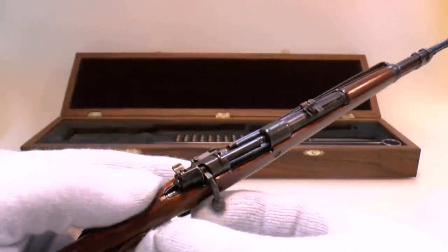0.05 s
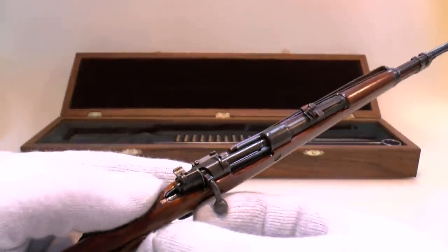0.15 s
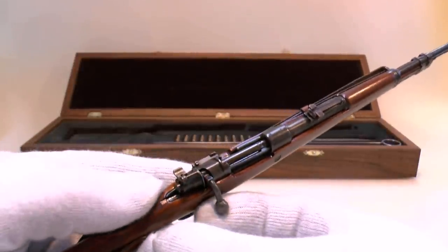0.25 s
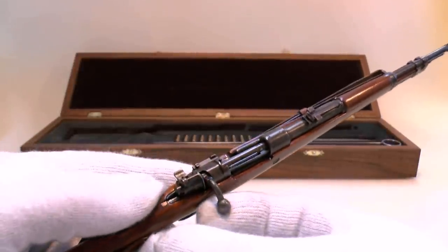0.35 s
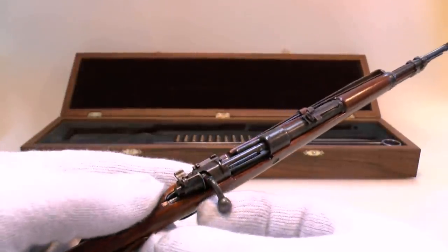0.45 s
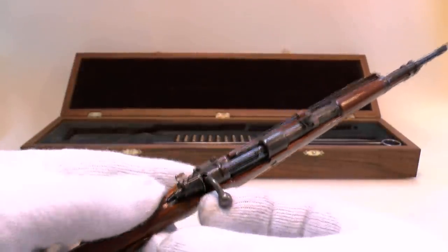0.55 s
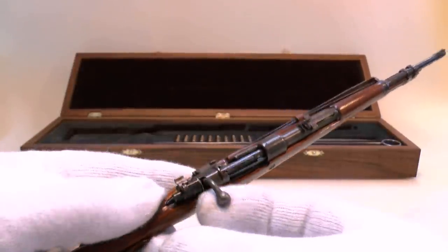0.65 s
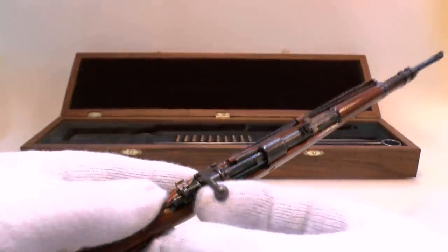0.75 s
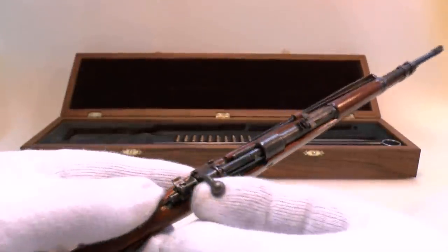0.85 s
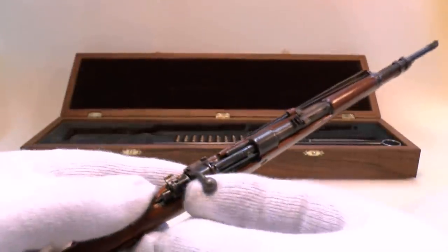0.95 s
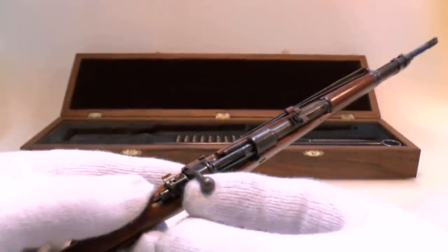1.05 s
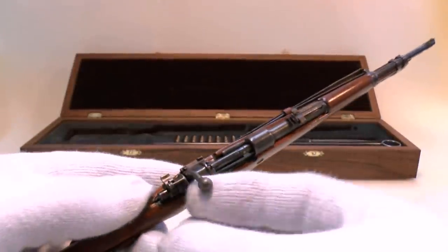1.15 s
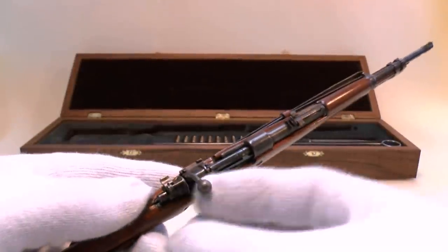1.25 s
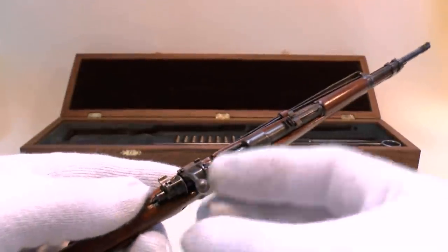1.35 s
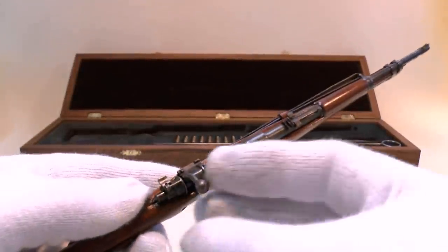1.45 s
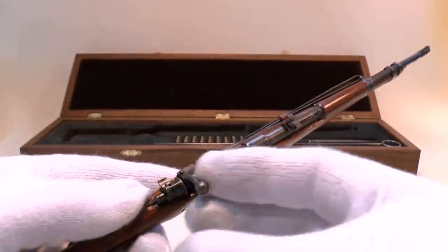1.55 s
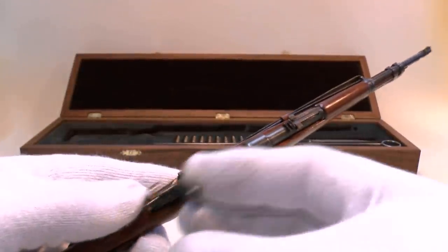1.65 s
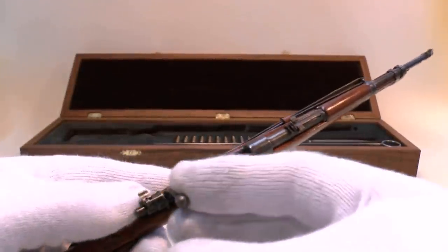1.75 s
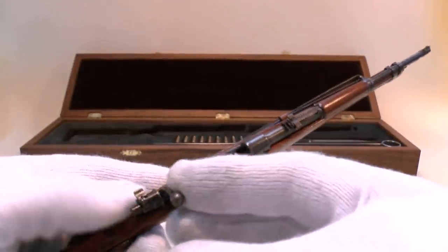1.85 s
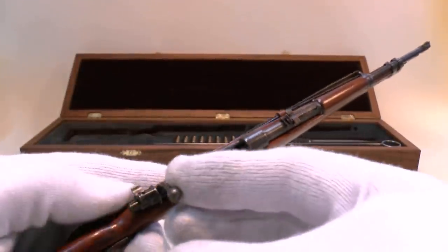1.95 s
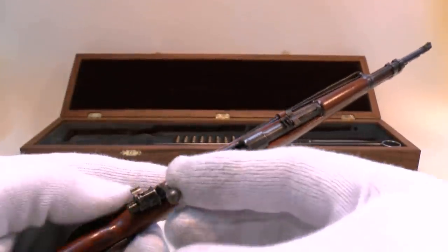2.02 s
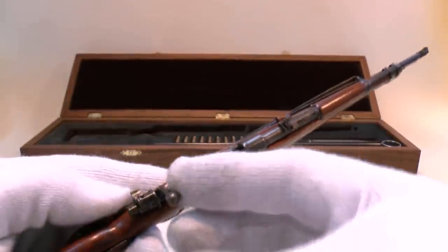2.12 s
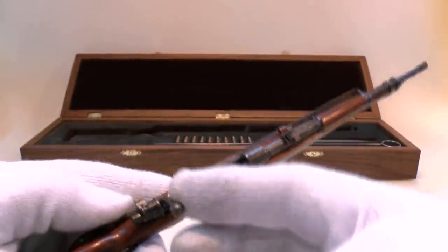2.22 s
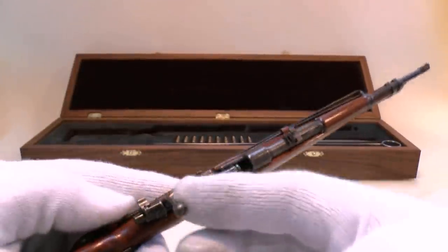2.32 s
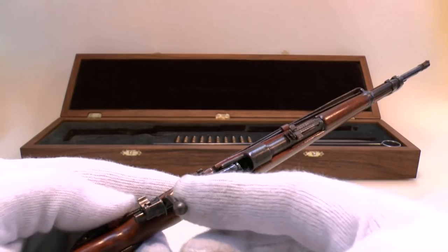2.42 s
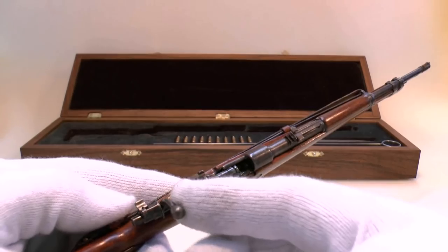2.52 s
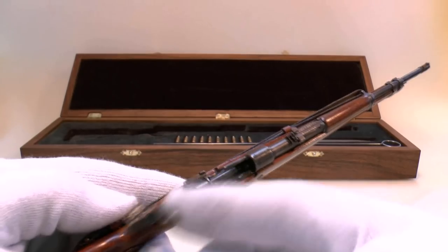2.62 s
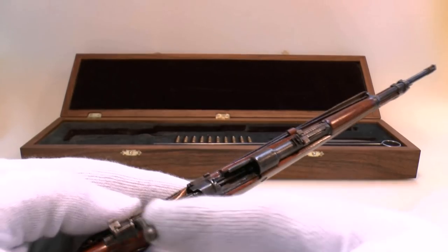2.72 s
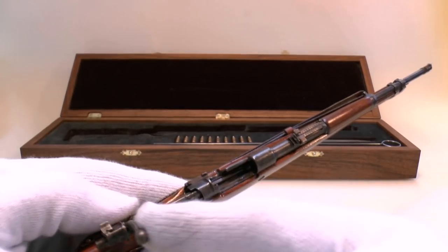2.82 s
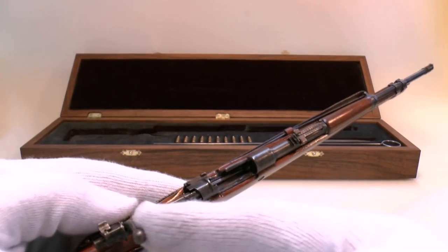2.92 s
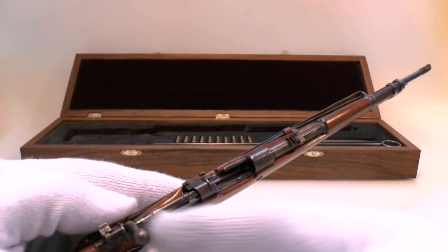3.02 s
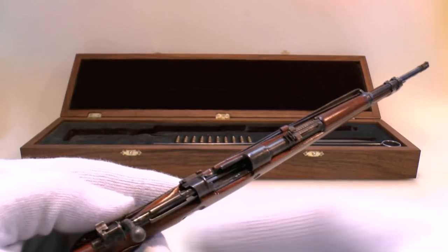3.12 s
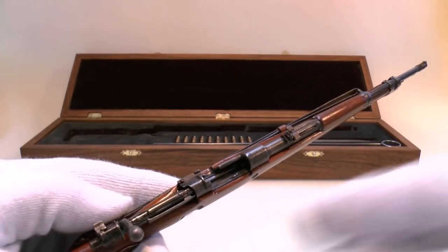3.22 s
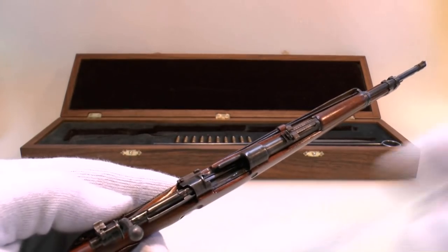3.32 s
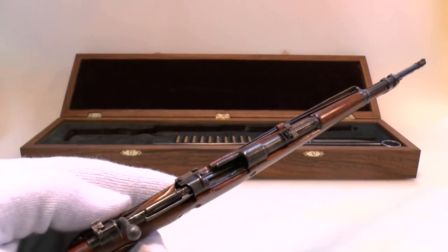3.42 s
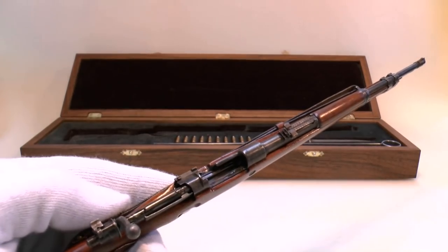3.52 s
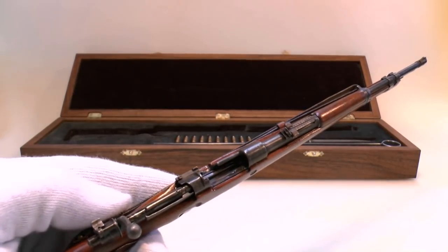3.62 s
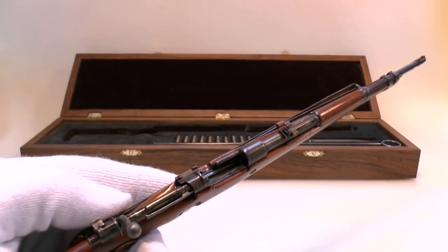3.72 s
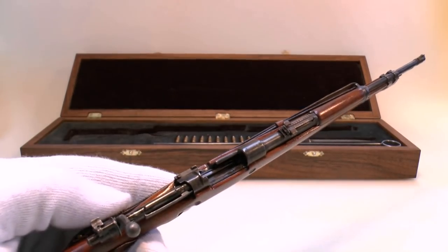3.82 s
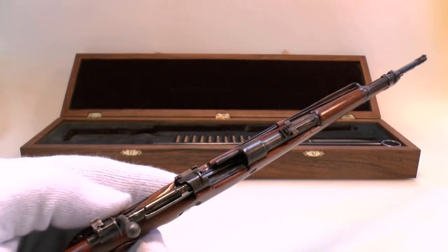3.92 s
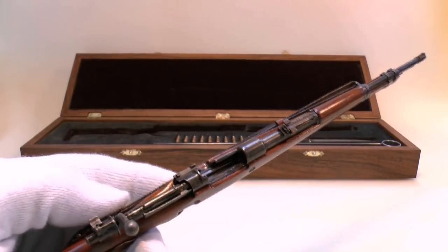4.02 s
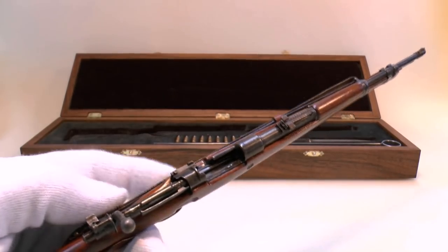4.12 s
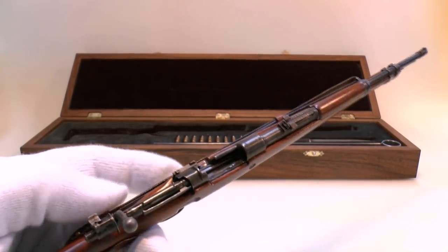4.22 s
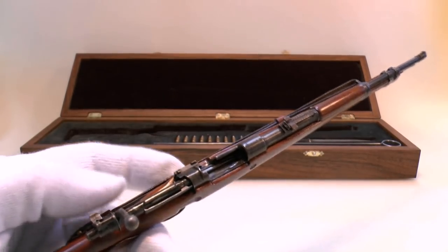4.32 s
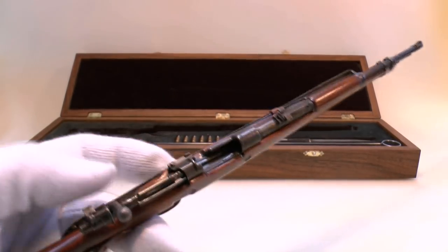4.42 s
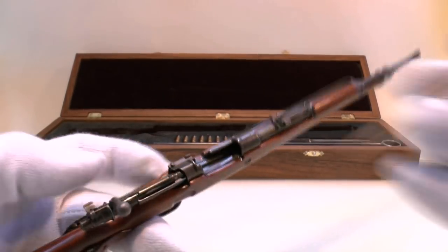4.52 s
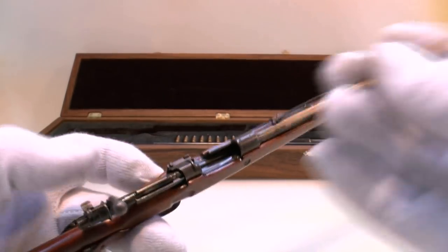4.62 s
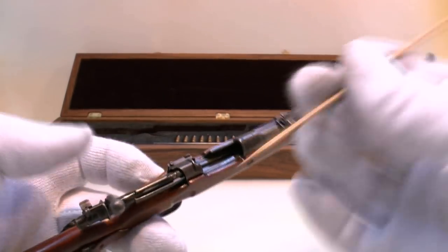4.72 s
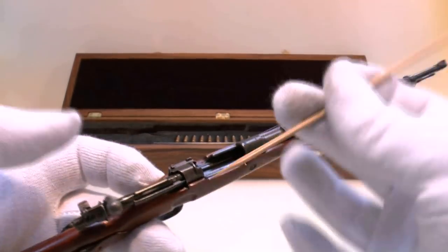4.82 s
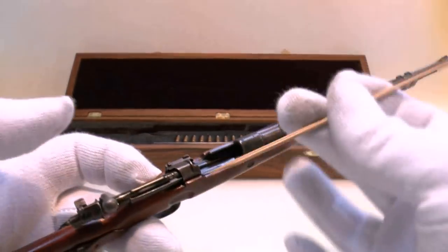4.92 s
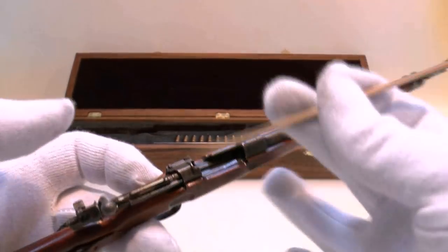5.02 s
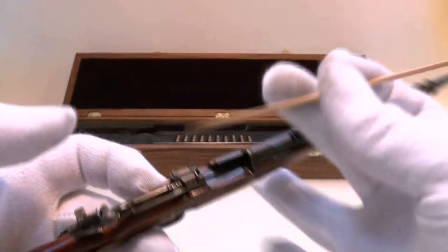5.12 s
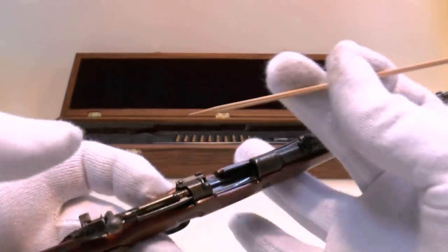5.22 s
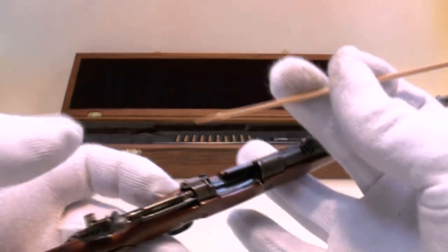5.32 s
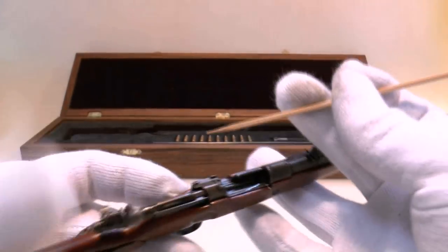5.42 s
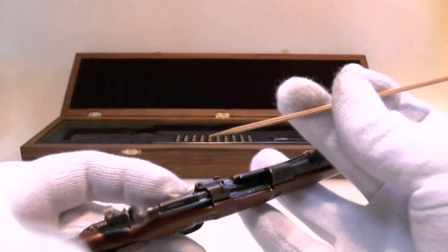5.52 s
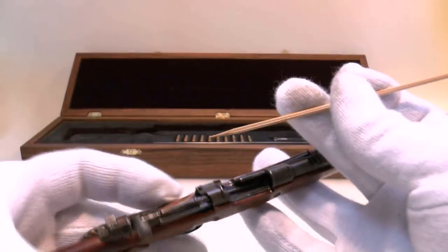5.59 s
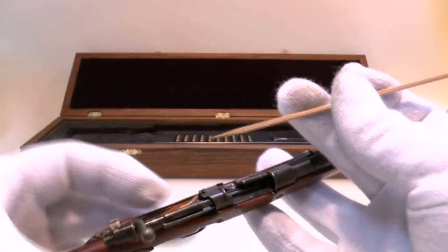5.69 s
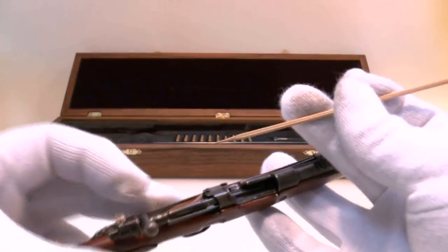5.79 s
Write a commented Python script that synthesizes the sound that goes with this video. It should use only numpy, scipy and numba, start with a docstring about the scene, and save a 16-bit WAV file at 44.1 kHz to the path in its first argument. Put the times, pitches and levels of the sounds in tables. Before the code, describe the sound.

Gloved hands work a small rifle's bolt, making light metallic clicks and one louder clack, with faint cloth rustle over a steady low hum.

```python
"""First comes a steady hum of fan and mains over airy hiss, with cotton gloves rustling up close.
The hands work the bolt of a small rifle: steel parts strike and slide, ringing the action and the
wooden stock, and rubbed parts squeak faintly. Each hit reflects off the tabletop at once, and a quiet
furnished room answers a moment later. Near 3 s the bolt hits its stop, the loudest clack, and jolts
the table under the microphones. A far rumble swells and fades beneath the last rustles."""
import sys
import numpy as np
from scipy import signal
from scipy.fft import rfft, irfft, next_fast_len
from scipy.io import wavfile
from scipy.ndimage import uniform_filter1d
from numba import njit

SR = 44100
rng = np.random.default_rng(int(sys.argv[2]) if len(sys.argv) > 2 else 0)


def put_to_file(sound):
    """Save the sound as 16-bit audio at rate SR, in the file named by the first command-line argument."""
    columns = np.atleast_2d(sound).T  # one column per channel
    safe = np.clip(columns, -1, 1)
    whole_steps = np.round(safe * 32767)
    wavfile.write(sys.argv[1], SR, whole_steps.astype(np.int16))


N = 258091

# harmonics of the fan shaft: multiple, rms level/dB
FAN_HARMONICS = [(2, -56), (3, -56.5), (4, -55), (5, -58.5), (6, -66.5), (7, -64.5), (8, -68)]
# harmonics of the mains buzz: multiple, rms level/dB
MAINS_HARMONICS = [(4, -75), (5, -63), (6, -69.5), (7, -66), (8, -79)]
# low narrow drones: f/Hz, rms level/dB, width/Hz
DRONES = [(60, -61, 8), (117, -60, 11), (248, -61, 14)]
# tone of the air noise and microphone hiss: f/Hz, relative level/dB
AIR_COLOUR = [(25, -49), (42, -43), (52, -17), (80, -9.5), (110, -6.5), (200, -1.5), (260, -6),
              (400, -15.5), (520, -13), (760, -21), (1300, -27.3), (2200, -31), (6000, -39), (12000, -39.5),
              (15500, -47)]
# how alike left and right are: f/Hz, correlation
STEREO_LIKENESS = [(60, 0.98916), (290, 0.96729), (640, 0.7499), (1400, 0.446), (3000, 0.3321), (6000, 1),
                   (9000, 0.441), (15000, 0.098)]
# glove moves: fullest t/s, rise/s, fall/s, rustle level/dB, rustle f/Hz, dull rub level/dB
GLOVE_MOVES = [(.17, .2, .08, -70, 5400, -68), (.42, .17, .14, -63, 7000, -68),
               (.73, .08, .06, -65, 7600, -68), (.86, .08, .09, -65, 7600, -68),
               (1.03, .04, .03, -68, 6900, -76), (1.26, .09, .14, -66, 7600, -60),
               (1.49, .12, .1, -69, 6800, -65), (2.07, .04, .07, -68, 6700, -65),
               (2.3, .05, .06, -63.5, 5400, -62), (2.48, .04, .04, -68, 7400, -75),
               (3.2, .14, .12, -61.5, 5900, -60), (3.6, .05, .22, -64, 7500, -80),
               (4.06, .015, .04, -65, 6500, -69), (4.22, .07, .08, -65, 6700, -64),
               (4.34, .02, .03, -67, 5200, -74), (4.52, .14, .13, -61, 7200, -62),
               (4.745, .045, .05, -56, 8600, -64), (4.9, .055, .06, -55.5, 7600, -63),
               (5.15, .15, .35, -67, 6700, -66.5), (5.59, .1, .12, -62.5, 7300, -60),
               (5.835, .05, .04, -58, 5800, -62)]
# hits of steel parts: t/s, peak level/dB (before chatter and bass cut), stock gain/dB,
# steel tilt/(dB per octave), favoured f/Hz, its lift/dB, second f/Hz, its gain/dB,
# tabletop reflection delay/ms, reflection gain/dB
HITS = [(.0675, -46, 9, -5, 2400, 6, 9000, -6, 1.4, -7),
        (.2142, -39.5, 14, -6, 2200, 10, 6500, -10, 1.37, -10),
        (.2544, -46, -5.5, -3, 11000, 6, 4000, 0.1, 1.4, -3),
        (.285, -47, -5, -4, 5700, 8, 7200, 6, 1.4, -6),
        (.4660, -37.5, 14, -2.5, 2200, 10, 10400, -10, 1.33, -10),
        (.7154, -46, 8, -5, 2090, 9, 9000, -4, 1.4, -9), (.7374, -46, 8, -5, 2260, 9, 9000, -4, 1.4, -7),
        (.755, -47, -3, -5, 4200, 10, 9000, -6, 1.4, -5),
        (.8050, -47, 3.5, -5, 4200, 6, 10000, -5, 1.6, -3), (.8867, -21, 0.1, 1, 5100, 5, 13000, 8, .6, -6),
        (.8876, -22, 10, -2, 2150, 3, 5100, 5, 1.1, -8), (1.1434, -39, -5, -1, 6000, 4, 9000, 3, .4, -3),
        (1.1446, -21, -3, 1.2, 5400, 9, 8400, 6, 1.9, -11),
        (1.8190, -28.5, 9, -7, 2300, 3.6, 7000, -4, .65, -9),
        (1.8322, -39, 1, -3, 4590, 6, 9000, -3, 1.43, -5.5),
        (1.8465, -40, 2, 0.1, 5500, 4, 8800, 4, .9, -3),
        (1.8490, -11.5, 4.5, -1, 3450, 4, 11000, 7.5, 1.35, -8),
        (1.9737, -29, 9, -6, 2500, 8, 7500, -8, 1.15, -6),
        (2.6709, -42, -2, -3, 8550, 6, 4000, 0.1, 1.22, -1.5),
        (2.7680, -47, 4.5, -5, 3810, 6, 9000, -2, 1.4, -12),
        (2.8422, -33, 8, -3, 3000, 6, 9000, -6, 1.4, -6), (2.8445, -21.5, 8, .5, 2700, 6, 7800, 6, .7, -7),
        (2.847, -27, 8, .5, 2900, 6, 10000, -6, 1.4, -8),
        (2.853, -29, -1.5, -1.5, 8200, 7, 4500, -3, 1.44, -9),
        (2.8600, -33, 6, -1.5, 1700, 5, 9000, -3, 2.6, 0.1),
        (2.8746, -21, 12, 3, 8700, 9, 12600, -8, 2.64, -9), (2.8870, -30, 6, .5, 2000, 6, 9000, 5, .73, -4),
        (2.8966, -36, 3.5, -2.5, 2600, 4, 9000, 4, 1.4, -6.5),
        (2.9880, -6.5, -9, 3, 5100, 7, 10400, 2.5, 1.58, -2),
        (2.9895, -24, -4, -1, 2040, 14, 7650, 8, 2.4, -5), (2.9925, -32, 2, -1, 2050, 12, 9600, 4, 1.4, -6),
        (4.1, -46, 6, -4, 2300, 4, 8000, -3, 1.4, -6),
        (4.2045, -33, 6.5, 2.5, 2200, 10, 9400, 3.5, .8, -11),
        (4.661, -48, 4, -2, 2500, 4, 8000, 2, 1.4, -6)]
# modes of the wooden stock: f/Hz, relative level/dB, t60/s, left minus right/dB
STOCK_MODES = [(1480, -13, .0095, 5.5), (1800, -6.5, .008, 4), (2030, -4.5, .013, 4),
               (2420, -5.5, .0075, 6), (2923, -1.8, .0062, 1.5), (3250, -1.5, .0075, 1),
               (3600, -5, .0065, 4), (3980, -10, .007, 3)]
# modes of the steel action: f/Hz, relative level/dB, t60/s, left minus right/dB
STEEL_MODES = [(4400, -3.5, .0095, 3), (5020, -5.5, .012, .8), (5380, -4, .0095, -.8), (5891, -9, .008, 3),
               (6300, -4, .0105, -.5), (6900, -3, .0069, .9), (7611, -8, .0105, -.7),
               (8117, -3, .0051, -.7), (8826, -2.5, .0115, 2.3), (9600, -2.5, .0095, -2.5),
               (10086, -2.5, .0048, .3), (10644, -8.5, .0095, -2.4), (11447, -4.5, .0062, 4),
               (12276, -11, .0095, 2.5), (13300, -13, .0053, 10), (13845, -13.5, .008, 5.3),
               (14900, -11, .004, .5)]
RIFLE_MODES = STOCK_MODES + STEEL_MODES
# tone of the room's tail: f/Hz, relative level/dB
ROOM_COLOUR = [(800, -10), (2000, -8), (3600, -5), (4300, -6), (5600, 1.5), (9500, -3), (12500, -7),
               (16000, -14)]
# rubbed parts singing: start t/s, end t/s, level/dB, start f/Hz, end f/Hz, width/Hz
SQUEAKS = [(.12, .23, -71, 5000, 5200, 400), (.16, .23, -72, 6200, 6200, 300),
           (.14, .4, -70, 2100, 2100, 25), (.23, .34, -70, 4200, 4300, 900),
           (.24, .3, -70, 5800, 6200, 2000), (.3, .56, -70, 8300, 8600, 1500),
           (.35, .5, -69, 5900, 6100, 1500), (.42, .54, -72, 2100, 2100, 25),
           (.64, .83, -68, 8700, 9310, 700), (.7, .77, -68, 3900, 4100, 1800),
           (1.25, 1.55, -68, 2200, 2150, 350), (1.675, 1.795, -67, 5130, 5030, 230),
           (4.72, 4.79, -64, 9300, 9300, 1500)]
# the bolt turns, then slides back in its channel: start t/s, end t/s, level/dB (before bass cut)
BOLT_STROKES = [(1.8, 1.849, -61), (2.824, 2.842, -56), (2.842, 2.902, -51.5)]
# knock through the table: t/s, level/dB, f/Hz, t60/s, left minus right/dB
TABLE_JOLT = (2.9887, -23, 175, .022, -9)
# far rumble: fullest t/s, rise/s, fall/s, level/dB, f/Hz, width/Hz
FAR_RUMBLE = (4.6, .7, .5, -58, 52, 30)


def undb(db):
    return 10 ** (np.asarray(db) / 20)


def unit(x):
    return x / np.sqrt(np.mean(x ** 2))


def band(x, hz, width_hz):
    return signal.lfilter(*signal.iirpeak(hz, hz / width_hz, fs=SR), x)


def narrow(x, hz, width_hz):
    """Two band-passes in a row, brought to rms 1."""
    return unit(band(band(x, hz, width_hz), hz, width_hz))


@njit
def swept_band(x, hz, q):
    """Band-pass whose centre moves, gain 1 at the centre."""
    y, mid, low = np.empty(len(x)), 0., 0.
    for i in range(len(x)):
        g = np.tan(np.pi * hz[i] / SR)
        v = (mid + g * (x[i] - low)) / (1 + g * (g + 1 / q))
        mid, low, y[i] = 2 * v - mid, low + 2 * g * v, v / q
    return y


def curve_at_bins(table, size):
    """A (f/Hz, value) curve read at the FFT bins, along log frequency."""
    hz, values = np.array(table).T
    bin_hz = np.maximum(np.arange(size // 2 + 1) * SR / size, 1)
    return np.interp(np.log(bin_hz), np.log(hz), values)


def stereo_noise(size, colour):
    """Coloured noise, as alike left and right as two close microphones hear it."""
    like = np.clip(curve_at_bins(STEREO_LIKENESS, size), 0, 1)
    mid, side = rfft(rng.standard_normal((2, size)))
    mid, side = mid * np.sqrt(1 + like), side * np.sqrt(1 - like)
    return unit(irfft(np.array([mid + side, mid - side]) * undb(curve_at_bins(colour, size)), size))


def waver(rate):
    """A smooth random drift that turns about rate times a second; spread near 1."""
    knots = uniform_filter1d(np.repeat(rng.standard_normal(int(N * rate / SR) + 2), 8), 8)
    return 1.2 * np.interp(np.arange(N) * (8 * rate / SR), np.arange(len(knots)), knots)


def swell(at, rise_s, fall_s, shape=1.5):
    """A hump of height 1; shape 1 is pointed, 2 is a bell."""
    t = np.arange(N) / SR - at
    return np.exp(-np.abs(t / np.where(t < 0, rise_s, fall_s)) ** shape)


def pan(left_minus_right_db):
    return undb(np.array([[1], [-1]]) * left_minus_right_db / 2)


def hum(fan_hz=48.391, mains_hz=100.):
    """The bed: wavering fan shaft harmonics, a near-steady mains buzz and low drones."""
    t = np.arange(N) / SR

    def stack(base_hz, harmonics, waver_db):
        return sum(np.sqrt(2) * undb(db + waver_db * waver(3.0194))
                   * np.sin(2 * np.pi * (k * base_hz * t + rng.random())) for k, db in harmonics)

    fan = stack(fan_hz, FAN_HARMONICS, waver_db=1.5)
    buzz = stack(mains_hz, MAINS_HARMONICS, waver_db=-.0811) * pan(-2.5)
    drones = sum(undb(db) * narrow(rng.standard_normal(N), hz, width) for hz, db, width in DRONES)
    return fan + buzz + drones


def air(level_db=-48):
    """Room tone: steady air noise and microphone hiss."""
    return undb(level_db) * stereo_noise(next_fast_len(N, True), AIR_COLOUR)[:, :N]


def gloves(rustle_q=.7, flicker_db=1.2, side_db=-9):
    """Cotton fibres slip over steel and wood: each move swells into a fine rustle and a duller rub."""
    moves = np.array([swell(*row[:3]) for row in GLOVE_MOVES])
    rustle_db, hz, rub_db = np.array(GLOVE_MOVES).T[3:]
    rustle_gain, rub_gain = undb(rustle_db) @ moves, undb(rub_db) @ moves
    # the loudest move pulls the rustle toward its own pitch
    centre_hz = (undb(rustle_db) * hz) @ moves / (rustle_gain + 1e-30)
    fibres = rng.standard_normal((4, N)) * undb(flicker_db * waver(60))
    rustle = unit(swept_band(swept_band(fibres[0], centre_hz, rustle_q), centre_hz, rustle_q))
    rustle_side = narrow(fibres[1], hz=10800, width_hz=3500)  # stereo width up top
    rub, rub_side = unit(band(fibres[2:], hz=2100, width_hz=1600))
    side = undb(side_db) * np.array([[1], [-1]])
    return (rustle + side * rustle_side) * rustle_gain + (rub + side * rub_side) * rub_gain


def ring(polarity, colour_db=0, tuning=1, length=1):
    """Stock and steel ring in stereo as decaying sines; length scales their decay times."""
    hz, db, t60, pan_db = np.array(RIFLE_MODES).T[:, :, None]
    t = np.arange(1024) / SR
    envelopes = undb(db + colour_db - 60 * t / (length * t60))
    tones = polarity * np.sin(2 * np.pi * hz * tuning * t) * envelopes
    return np.array([(tones * undb(side * pan_db / 2)).sum(axis=0) for side in (1, -1)])


def strike_colour(stock_db, tilt_db, favoured_hz, lift_db, second_hz, second_db):
    """Gain in dB per mode: the struck spot favours one pitch and lifts or mutes another."""
    hz = np.array(RIFLE_MODES)[:, :1]
    base = np.where(hz < STEEL_MODES[0][0], stock_db, tilt_db * np.log2(hz / 7000))
    favoured = lift_db * np.exp(-(np.log2(hz / favoured_hz) / .22) ** 2)
    second = second_db * np.exp(-(np.log2(hz / second_hz) / .25) ** 2)
    return base + favoured + second


def clicks(scatter_db=1.2, detune=.008, crack_db=-9, crack_t60=.0025, chatter_db=-9, chatter_t60=.026,
           send_db=1.8, ring_loss_per_db=.013):
    """Each hit cracks and rings, followed at once by a quick reflection off the tabletop."""
    close, send = np.zeros((2, 2, N + 4096))  # send feeds the room
    t = np.arange(1024) / SR
    # neighbouring stock modes, and pairs of steel modes, swing in opposite directions
    polarity = (-1.) ** np.r_[np.arange(len(STOCK_MODES)), 1 + np.arange(len(STEEL_MODES)) // 2][:, None]
    variations = rng.random((len(HITS), 2, len(RIFLE_MODES), 1)) - .5
    chatter = rng.standard_normal((len(HITS), 2, len(t))) * undb(-60 * t / chatter_t60)
    contacts = undb(chatter_db) * chatter / np.sqrt((chatter ** 2).sum(axis=2, keepdims=True))
    contacts[..., 0] += 1  # the clean impact ahead of the chatter of loose parts
    for row, (scatter, mistune), contact in zip(HITS, variations, contacts):
        at, peak_db, *spot, reflection_ms, reflection_db = row
        colour_db = strike_colour(*spot) + scatter_db * np.sqrt(12) * scatter
        length = 1 + ring_loss_per_db * peak_db  # softer hits ring shorter
        body = ring(polarity, colour_db, 1 + detune * mistune, length)
        # in the first instant the modes blur into a broad crack, which also reaches the walls
        crack = body * undb(-60 * t / crack_t60)
        crack *= np.sqrt((body ** 2).sum() / (crack ** 2).sum())
        click = body + undb(crack_db) * crack
        gain = undb(peak_db) / np.abs(click).max()
        hit, reflection = signal.fftconvolve(gain * click[None], contact[:, None], axes=2)
        i, j = int(at * SR), int((at + reflection_ms / 1000) * SR)
        close[:, i:i + hit.shape[1]] += hit
        close[:, j:j + hit.shape[1]] += undb(reflection_db) * reflection
        send[:, i:i + len(t)] += undb(send_db) * gain * crack * np.hypot(1, undb(reflection_db))
    return close[:, :N], send[:, :N]


def room(send, predelay_s=.0123, echo_db=-24, tail_db=-15, t60=.34):
    """The walls answer with a first echo, then a dense fading tail."""
    t = np.arange(16384) / SR
    tail = stereo_noise(len(t), ROOM_COLOUR) * undb(-60 * t / t60)
    response = undb(tail_db) * tail / np.sqrt((tail ** 2).sum(axis=1).mean())
    response[:, 0] += undb(echo_db)
    wet = signal.fftconvolve(send.mean(axis=0)[None], response, axes=1)
    return np.pad(wet, ((0, 0), (int(predelay_s * SR), 0)))[:, :N]


def squeaks(fade_s=.02946):
    """Rubbed parts sing faintly in bands of noise that hold or glide."""
    out = np.zeros(N)
    for start, end, db, start_hz, end_hz, width_hz in SQUEAKS:
        i, j = int(start * SR), int(end * SR)
        t = np.arange(i, j) / SR
        glide_hz = np.interp(t, [start, end], [start_hz, end_hz])
        tone = unit(swept_band(rng.standard_normal(j - i), glide_hz, start_hz / width_hz))
        envelope = np.interp(t, [start, start + fade_s, end - fade_s, end], [0, 1, 1, 0])
        out[i:j] += undb(db) * tone * envelope
    return out


def bolt_slides(grain_db=3., flutter_db=2.1, fade_s=.001413):
    """Dense uneven slips ring stock and steel while the bolt moves."""
    t = np.arange(N) / SR
    push = sum(undb(db) * np.interp(t, [start, start + fade_s, end, end + fade_s], [0, 1, 1, 0])
               for start, end, db in BOLT_STROKES)
    friction = rng.standard_normal(N)
    grit = undb(grain_db * rng.exponential(size=N) + flutter_db * waver(120))
    slips = push * unit(friction * grit)
    body = ring(polarity=np.sign(rng.standard_normal((len(RIFLE_MODES), 1))))
    body /= np.sqrt((body ** 2).sum(axis=1).mean())
    return signal.oaconvolve(slips[None], body, axes=1)[:, :N]


def table_jolt():
    """The bolt stop jolts the table: a low damped knock moves the two microphones opposite ways."""
    at, db, hz, t60, pan_db = TABLE_JOLT
    t = np.maximum(np.arange(N) / SR - at, 0)
    knock = np.sin(2 * np.pi * hz * t) * undb(db - 60 * np.minimum(t / t60, 4))
    return np.array([knock, -knock]) * pan(pan_db)


def far_rumble():
    """One low band of noise swells and fades in the distance."""
    at, rise_s, fall_s, db, hz, width_hz = FAR_RUMBLE
    return undb(db) * swell(at, rise_s, fall_s) * narrow(rng.standard_normal(N), hz, width_hz)


def scene(bass_cut_hz=1350):
    """The mix: hands, rifle and room over the steady bed."""
    hits, send = clicks()
    scrape = bolt_slides()
    # a small object radiates little bass
    bass_cut = signal.butter(5, bass_cut_hz, "high", fs=SR, output="sos")
    rifle = signal.sosfilt(bass_cut, hits + scrape)
    walls = room(signal.sosfilt(bass_cut, send + scrape))
    return hum() + air() + gloves() + rifle + walls + squeaks() + table_jolt() + far_rumble()


def record(dry):
    """A steep low-pass shaves off the top above 15.8 kHz."""
    return signal.sosfilt(signal.ellip(12, .2, 70, 15800, fs=SR, output="sos"), dry)


dry = scene()
out = record(dry)
put_to_file(out)
```